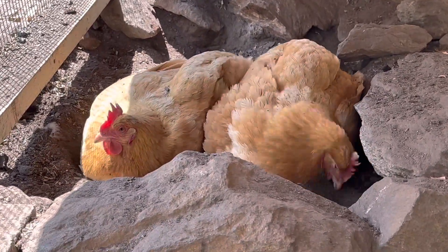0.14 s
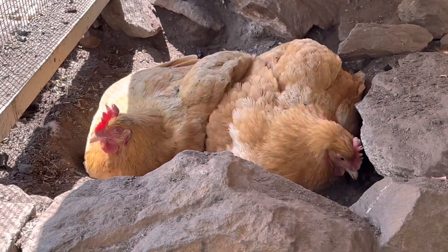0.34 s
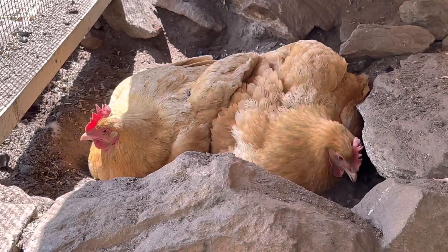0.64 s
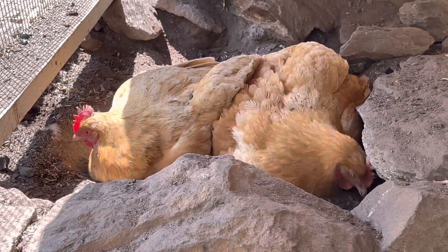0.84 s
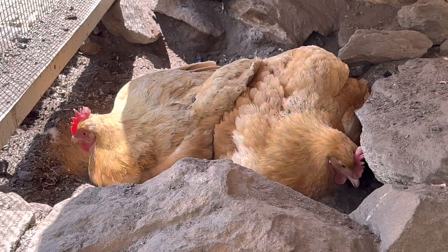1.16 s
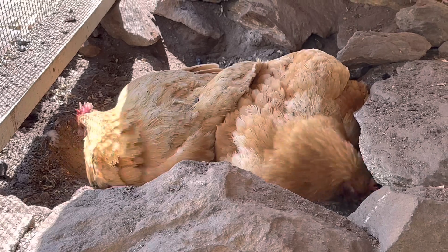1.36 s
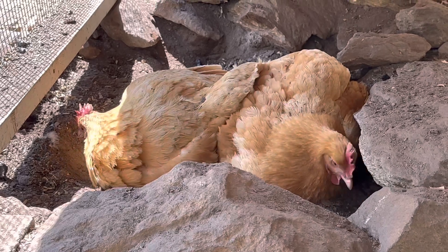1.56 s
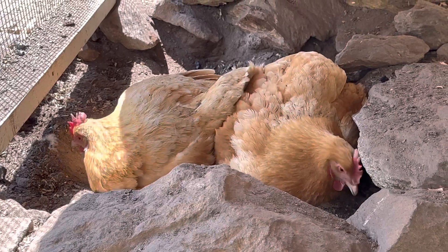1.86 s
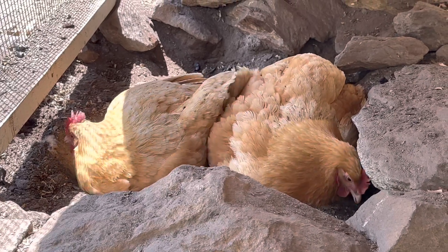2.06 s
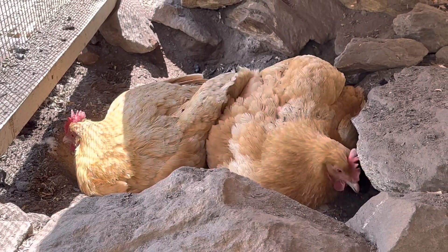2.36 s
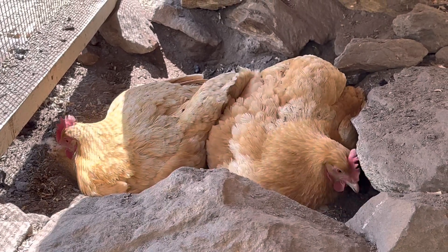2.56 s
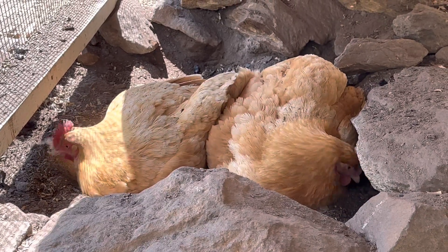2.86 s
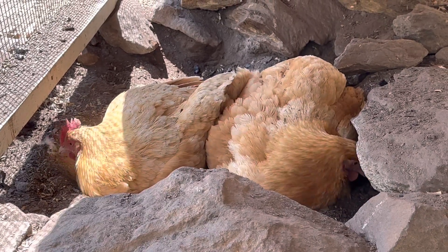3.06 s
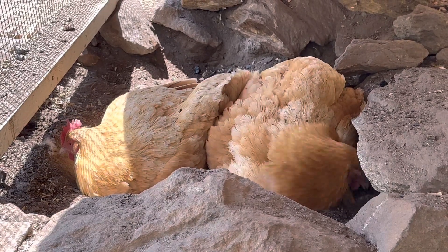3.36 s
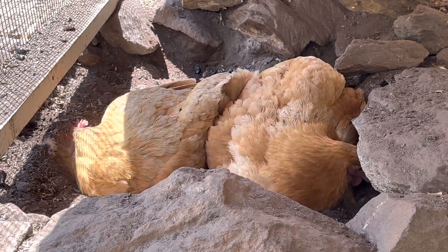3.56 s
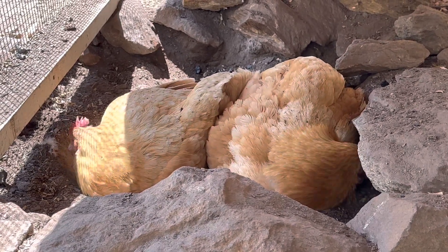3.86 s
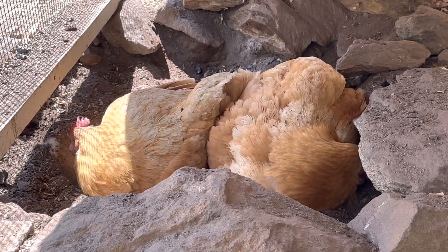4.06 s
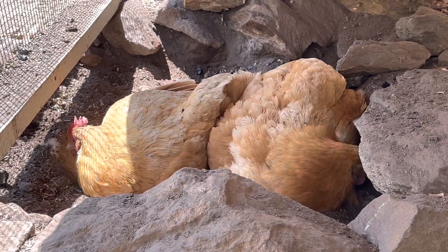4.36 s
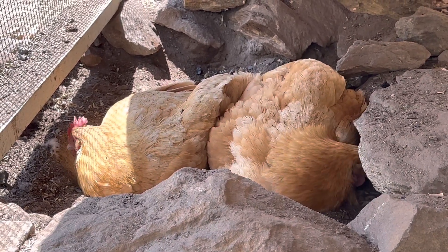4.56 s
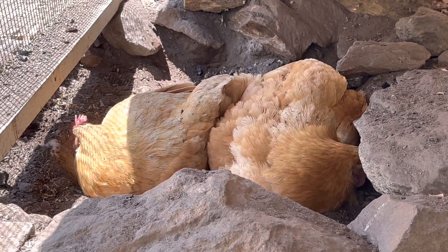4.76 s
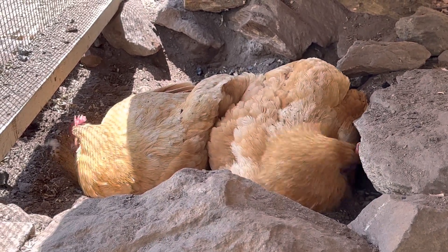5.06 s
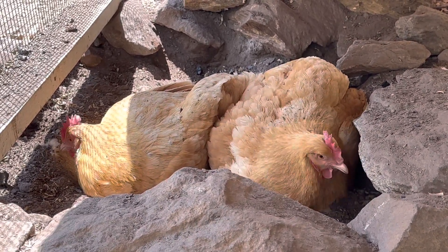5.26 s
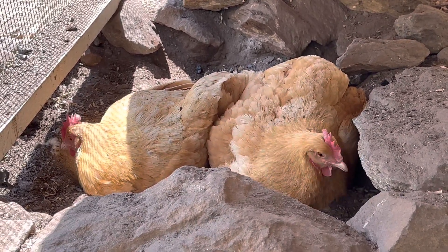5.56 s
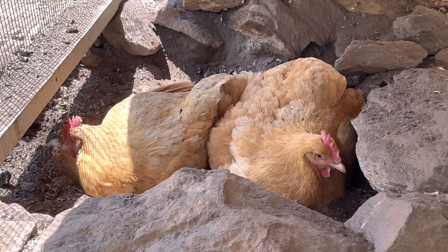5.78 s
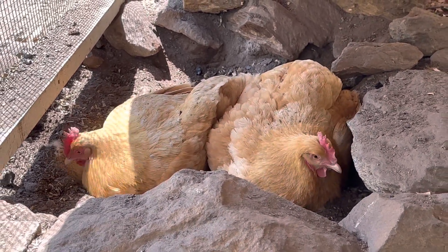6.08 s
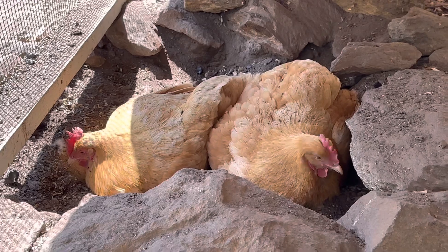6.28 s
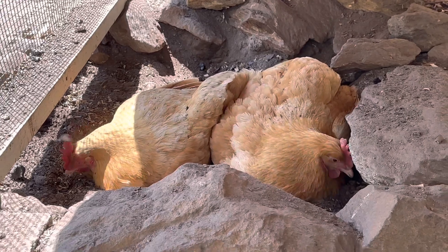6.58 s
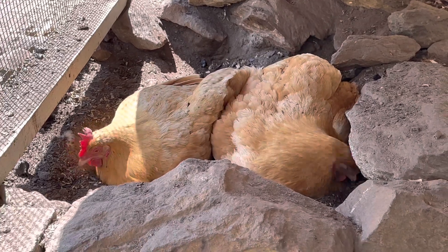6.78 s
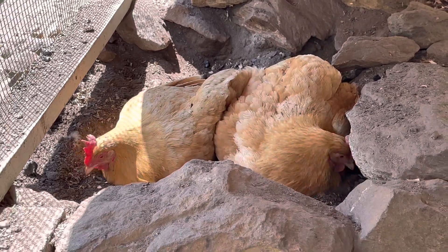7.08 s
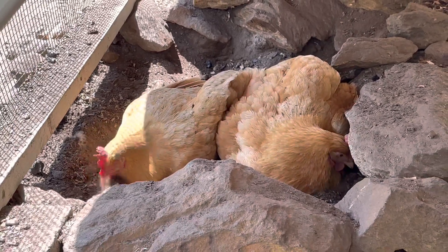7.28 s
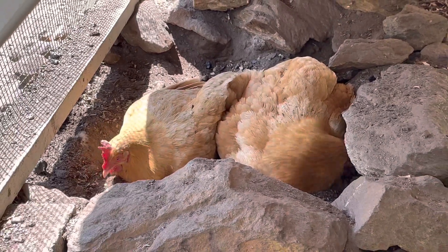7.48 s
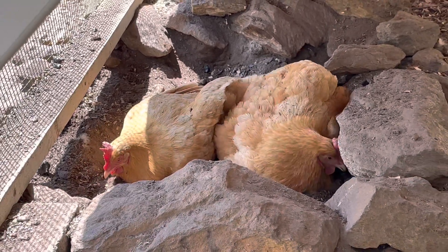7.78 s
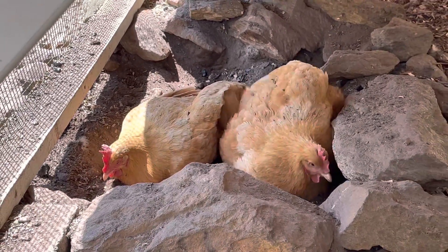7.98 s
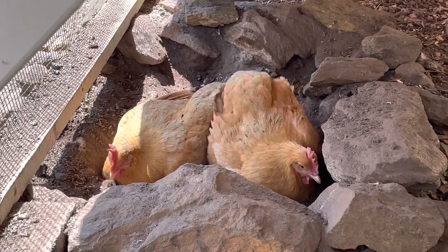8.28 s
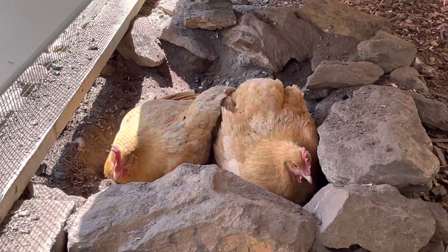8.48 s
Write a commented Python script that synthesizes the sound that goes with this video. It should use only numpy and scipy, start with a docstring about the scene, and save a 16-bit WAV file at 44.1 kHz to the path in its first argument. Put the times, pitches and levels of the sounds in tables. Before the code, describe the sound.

Two hens shuffle in a dusty hollow between rocks, heard close: dry grit trickles and ticks, feathers brush softly, beaks scrape and thud. One gives a single short, low cluck early on. Small birds peep thinly a little way off. Far behind, an engine rises in pitch over low traffic, drops out for a gear change, then pulls again. Three brief squeaks come from the dust near the end.

```python
"""From the start two hens shuffle in a dust hollow between rocks: feathers brush, grit ticks, beaks scrape.
Small birds peep a little way off, and a distant engine pulls up in pitch over the low wash of traffic.
At 1.7 s one hen clucks once. Near 4.5 s the engine drops out for a gear change, and from 5.2 s it pulls again.
Late on, three brief squeaks come from the dust. The noises are shaped random grains; the voices,
the engine and the squeaks are built from gliding tones and resonances."""
import sys
import numpy as np
from scipy import signal
from scipy.fft import rfft, irfft
from scipy.io import wavfile
from scipy.ndimage import uniform_filter1d

SR = 44100
rng = np.random.default_rng(int(sys.argv[2]) if len(sys.argv) > 2 else 0)


def wav_record(signal):
    """Record a signal, one row per channel, as 16-bit PCM in the file named by sys.argv[1]."""
    frames = np.transpose(np.atleast_2d(signal))
    bounded = np.clip(frames, -1, 1)
    # unit amplitude maps onto the largest positive 16-bit level
    quanta = np.round(bounded * 32767).astype(np.int16)
    wavfile.write(sys.argv[1], SR, quanta)


N = 380583
TIME = np.arange(N) / SR


def gain_of(db):
    """Turns decibels into amplitude."""
    return 10 ** (np.asarray(db) / 20)


def evened(x):
    """Scales a sound to an average strength (rms) of 1."""
    return x / np.sqrt(np.mean(x ** 2) + 1e-20)


def read(points, hz):
    """Reads a table of values between its points, on a log-frequency axis."""
    f, value = np.transpose(points)
    return np.interp(np.log(hz + 1), np.log(f + 1), value)


def add(mix, start, sound):
    """Adds a sound to the mix at its start time in seconds."""
    part = mix[max(round(start * SR), 0):][:len(sound)]
    part += sound[:len(part)]


def colour(x, spectrum):
    """Filters a sound by a spectrum, which sets its tone colour, at rms 1."""
    hz = np.fft.rfftfreq(len(x), 1 / SR)
    return evened(irfft(rfft(x) * gain_of(read(spectrum, hz)), len(x)))


def wander(size, hz):
    """Makes a random curve of rms 1 that drifts no faster than hz."""
    knots = rng.standard_normal(int(size / SR * hz * 2) + 3)
    return evened(np.interp(np.arange(size) / SR * hz * 2, np.arange(len(knots)), knots))


def resonate(x, hz, width):
    """Passes a sound through a resonance of gain 1 at a fixed pitch."""
    return signal.lfilter(*signal.iirpeak(hz, hz / width, fs=SR), x)


def formant(x, hz, width):
    """Passes a sound through a resonance of gain 1 whose pitch may follow a curve."""
    turn = np.exp(2j * np.pi * np.cumsum(hz * np.ones(len(x))) / SR)
    r = np.exp(-np.pi * width / SR)
    # Shift the pitch down to zero, smooth, and shift it back.
    return 2 * (turn * signal.lfilter([1 - r], [1, -r], x / turn)).real


def crumble(size, per_s, spread_db, smooth, sharpness=5):
    """Tiny impacts of very unequal size, each with its own brief pitch, over a smooth rub."""
    grains = np.zeros(size)
    for hz in np.geomspace(1200, 15000, 12):
        hits = rng.poisson(per_s * size / SR / 12)
        size_db = spread_db * np.minimum(rng.exponential(1, hits), 4)
        strength = gain_of(size_db) * rng.choice([-1, 1], hits)
        train = np.bincount(rng.integers(0, size, hits), strength, size)
        grains += resonate(train, hz, hz / sharpness)
    return evened(evened(grains) + smooth * rng.standard_normal(size))


# Shoves of a hen through the dust: (strongest at [s], length [s], grit level [dB], feather level [dB])
STROKES = [(0.084, 0.13, -76, -81), (0.214, 0.18, -73, -88), (0.496, 0.067, -76.5, -84),
           (0.59, 0.075, -87, -95), (0.917, 0.19, -79, -88), (1.363, 0.048, -68, -78),
           (2.182, 0.084, -85, -83), (2.579, 0.22, -79, -82), (2.683, 0.11, -77.5, -70.5),
           (2.805, 0.15, -81.5, -76), (3.203, 0.97, -84.5, -85.5), (3.317, 0.027, -58.5, -73),
           (3.626, 0.12, -76.5, -90), (3.755, 0.13, -75, -81), (3.9, 0.16, -83, -85),
           (4.177, 0.031, -77, -74), (4.255, 0.074, -73, -77), (5.299, 0.98, -86.5, -89),
           (5.563, 0.041, -71, -82), (5.852, 0.23, -78, -82), (6.032, 0.12, -75.5, -79),
           (6.542, 0.29, -85, -91), (6.869, 0.08, -76, -83), (7.203, 0.084, -82, -79),
           (7.495, 0.06, -74.5, -76), (7.636, 0.061, -80.5, -95), (7.84, 0.14, -74, -80),
           (8.087, 0.069, -78, -93), (8.316, 0.074, -64, -80), (8.419, 0.12, -68.5, -72)]
# Tone of dry grit: (frequency [Hz], relative level [dB per Hz])
GRIT_TONE = [(500, 13.5), (1800, -2), (3000, 3), (4500, -3.5), (7000, -2.5), (8300, -4.5), (10000, -9.5),
             (13000, -22), (16000, -35.5)]
# Tone of brushed feathers: (frequency [Hz], relative level [dB per Hz])
FEATHER_TONE = [(5000, -30), (9000, -11), (12000, 0.5), (15000, 5.5), (16000, -3)]


def shuffle(clump_db=3.0, soil_spread_db=3):
    """Each shove builds up and dies away: dry soil trickles and feathers brush in clumps."""
    t = TIME[::64]
    rise, end_db = .43, -12  # share of a shove spent building up; level at its ends
    # The hens are never quite still.
    grit_power, feather_power = gain_of(-98) ** 2, gain_of(-100) ** 2
    for strongest, length, grit_db, feather_db in STROKES:
        u = (t - strongest) / length
        away = np.maximum(-u / rise, u / (1 - rise))
        fade_db = end_db * np.minimum(away, 10) ** 0.91
        grit_power = grit_power + gain_of(grit_db + fade_db) ** 2
        feather_power = feather_power + gain_of(feather_db + fade_db) ** 2
    clumps = gain_of(clump_db * wander(N, 38))
    soil = colour(crumble(N, per_s=1800, spread_db=soil_spread_db, smooth=.45, sharpness=10), GRIT_TONE)
    plumes = colour(crumble(N, per_s=6000, spread_db=3.5, smooth=.8), FEATHER_TONE)
    soil = soil * np.interp(TIME, t, np.sqrt(grit_power))
    plumes = plumes * np.interp(TIME, t, np.sqrt(feather_power))
    return clumps * (soil + plumes)


# Pecks and scrapes: (time [s], rise [s], decay [s], crunch level [dB], thud level [dB])
SCRAPES = [(.93, 0.0047, 0.033, -67, -64), (1.364, 0.00076, 0.0056, -50, -49),
           (2.144, .0015, 0.032, -66.5, -57), (2.17, 0.018, 0.028, -66.5, -67),
           (3.281, .001, 0.008, -77, -60.5), (3.311, 0.0034, 0.0059, -66, -47),
           (3.32, 0.0019, 0.0045, -59.5, -51), (3.851, 0.0011, 0.0084, -59.5, -71),
           (4.243, 0.0068, 0.024, -64.5, -63), (4.291, 0.00052, 0.0051, -66, -55.5),
           (5.182, 0.0004, 0.012, -59, -69), (6.028, 0.00077, 0.0092, -64, -70),
           (6.516, 0.0074, 0.009, -70, -62), (6.688, 0.003, 0.022, -71, -59),
           (7.171, 0.04, 0.025, -62.5, -64.5), (7.481, 0.0079, 0.022, -70, -62.5),
           (8.283, 0.007, 0.025, -59, -69), (8.334, .008, 0.022, -68, -60), (8.435, 0.0034, .008, -69, -71)]
# Tone of the crunch: (frequency [Hz], relative level [dB per Hz])
CRUNCH_TONE = [(200, 9), (700, 8), (1400, 5.5), (2600, 12), (3800, 3), (6000, -9), (8300, -5),
               (11000, -25.5), (16000, -28)]
# Tone of the thud: (frequency [Hz], relative level [dB per Hz])
THUD_TONE = [(80, -23.5), (200, 6), (320, -15), (500, -7), (900, -5), (1500, -8), (3000, -54), (8000, -60)]


def scrapes(per_s=6000, spread_db=3, smooth=0.52, thud_linger=0.0014):
    """A beak or claw crunches through grit and thuds on the soil, the thud dying a little later."""
    out, t = np.zeros(N), np.arange(8192) / SR
    for start, rise, decay, crunch_db, thud_db in SCRAPES:
        attack, after = np.minimum(t / rise, 1), np.maximum(t - rise, 0)
        crunch = colour(crumble(len(t), per_s, spread_db, smooth), CRUNCH_TONE)
        crunch = gain_of(crunch_db) * crunch * np.exp(-after / decay)
        thud = colour(rng.standard_normal(len(t)), THUD_TONE)
        thud = gain_of(thud_db) * thud * np.exp(-after / (decay + thud_linger))
        add(out, start, attack * (thud + crunch))
    return out


# Squeaks: (time [s], time to fade by 23 dB [s], level [dB], extra level of the side modes [dB])
SQUEAKS = [(7.205, 0.038, -60.5, -13), (8.281, 0.051, -49, 2.5), (8.34, 0.048, -57, -5)]
# Ringing modes, perhaps of a scraped stone: (pitch [Hz], waver of the pitch [Hz], level [dB])
STONE_MODES = [(686, 58, -1.5), (1462, 60, -6), (1917, 15, 6.5), (2335, 25, -14), (3220, 37, -25),
               (3540, 67, -27), (4370, 54, -17), (6600, 60, -15)]


def squeaks(stutter_db=0.8):
    """The stone's modes waver and stutter while it is rubbed, then stop; a harder rub wakes more of them."""
    out, t = np.zeros(N), np.arange(4096) / SR
    loudest = max(db for _, _, db in STONE_MODES)
    for start, length, level_db, side_db in SQUEAKS:
        ring = np.zeros(len(t))
        for hz, waver_hz, db in STONE_MODES:
            mode_db = db + side_db * (db < loudest) + stutter_db * wander(len(t), 106)
            angle = 2 * np.pi * np.cumsum(hz + waver_hz * wander(len(t), 142)) / SR
            ring += gain_of(mode_db) * np.sin(angle)
        rise = np.minimum(t / 0.0077, 1)
        add(out, start, evened(ring) * rise * gain_of(level_db - 23 * (t / length) ** 2))
    return out


# The loudest grains flicked against the rocks:
# (time [s], level [dB], share of top treble [dB, kept between -20 and -0.4], ring pitch [Hz])
TICKS = [(.075, -61, -22, 3400), (.1366, -68, -8, 6650), (.1705, -69, -22, 3570), (.2214, -62, -5, 4630),
         (.2535, -63, -12, 3500), (.286, -60, -25, 3420), (.595, -71, -25, 3320), (1.0974, -70, -6, 3980),
         (1.3665, -53, -19, 8100), (1.399, -70, -12, 6000), (2.5411, -73, 1, 4270), (2.7013, -62, -7, 4800),
         (2.797, -74, -9, 5060), (2.825, -67, -11, 6760), (2.881, -60.5, 1.5, 8840),
         (2.988, -70, -12, 6500), (2.997, -60.5, -6, 9100), (3.202, -63.5, -5, 5570),
         (3.2812, -53, -21, 4930), (3.3108, -47, -23, 3370), (3.422, -68.5, -17, 4600),
         (3.6238, -65.5, -15, 6180), (3.708, -64, -17, 8330), (3.8513, -56, -9, 6900),
         (3.859, -61.5, -11, 4290), (3.92, -72, -11, 3400), (4.2926, -58, -16, 3320),
         (4.5872, -68, -28, 3450), (5.182, -65, -26, 3400), (5.435, -75, 0, 3670), (5.5273, -73, 1, 3390),
         (5.739, -69, -24, 6850), (5.7728, -65.5, -27, 7900), (5.9324, -64, -23, 8200),
         (6.0267, -55.5, -9, 4240), (6.481, -63.5, -16, 4460), (7.2929, -67, .5, 3400),
         (7.4629, -66, -11, 3330), (7.7656, -61, -31, 5180), (7.9159, -61.5, -13, 6540),
         (8.13, -61.5, -8, 7800), (8.285, -57, -22, 7950), (8.3735, -60, -24, 5760),
         (8.406, -62, -22, 7220), (8.4225, -61, -9, 6010), (8.4745, -63.5, -25, 4500),
         (8.5774, -70, -9, 5490)]


def flung_grains(per_s=45, level_db=-3.5, spread_db=5, top_db=-20, low_hz=4080, high_hz=9160):
    """Each shove also flings grains at random moments, with random strengths and ring pitches."""
    flung = []
    for strongest, length, grit_db, _ in STROKES:
        for when, size, note in rng.random((64, 3))[:round(per_s * length)]:
            start = strongest + length * (when - .5)
            db = grit_db + level_db - spread_db * np.log(max(size, .2))
            flung.append((start, db, top_db, low_hz * (high_hz / low_hz) ** note))
    return flung


def ticks(grit_db=-1, top_db=3, ring_db=-8):
    """A grain cracks against rock and rings briefly, and finer dust settles after it."""
    out, t = np.zeros(N), np.arange(2048) / SR
    crack_s, decay_s, settle_s, ring_s = 0.00014, 0.0038, 0.013, 0.0076
    fade = gain_of(3) * np.exp(-t / crack_s) + np.exp(-t / decay_s) + gain_of(-19) * np.exp(-t / settle_s)
    for start, db, bright_db, pitch in list(TICKS) + flung_grains():
        share = np.clip(gain_of(bright_db), .1, .95)
        low, high = rng.standard_normal((2, len(t)))
        dull = gain_of(grit_db) * np.sqrt(1 - share ** 2) * colour(low, GRIT_TONE)
        bright = gain_of(top_db) * share * colour(high, FEATHER_TONE)
        ring = gain_of(ring_db) * (1 - share) * np.sin(2 * np.pi * pitch * t) * np.exp(-t / ring_s)
        add(out, start, gain_of(db) * ((dull + bright) * fade + ring))
    return out


# The cluck: (time [s], effort [dB], pitch [Hz], beak opening as gain of the upper resonances [dB],
# wheeze against the voice, before it is pulsed [dB])
CLUCK = [(1.7299, -50, 270, 6, -46), (1.734, -46, 283, 6, -42), (1.738, -36.5, 284, 1, -35),
         (1.746, -34.5, 293, 1.5, -26), (1.753, -33, 273, -2.5, -22), (1.763, -29.5, 259, -6.5, -27),
         (1.768, -34, 250, -7, -32), (1.772, -46, 240, 2, -52)]
# Throat resonances, chest first: (pitch [Hz], width of one of two passes [Hz], level [dB])
THROAT = [(270, 150, 3), (623, 180, 2.5), (867, 116, 7), (1206, 170, -5)]
# Air through the hen's throat: (pitch [Hz], width of one of two passes [Hz], level [dB])
WHEEZE = [(2050, 240, -11), (3350, 220, -14), (3920, 200, -9)]


def cluck(rasp=0.06, jitter=0.023, limp=0.53):
    """Pulses in uneven pairs pass the throat, every second one wheezing; the beak closes and the note darkens."""
    times, *columns = np.transpose(CLUCK)
    t = np.arange(times[0] - .02, times[-1], 1 / SR)
    effort_db, pitch, open_db, wheeze_db = (np.interp(t, times, c) for c in columns)
    angle = 2 * np.pi * np.cumsum(pitch * (1 + jitter * wander(len(t), 261))) / SR
    angle -= np.interp(times[0], t, angle)
    pair = np.cos(angle / 2)  # one turn for every two pulses
    uneven = limp * pair * np.interp(t, times[[0, -1]], [.3, 1])
    harmonics = np.arange(1, 5)[:, None]
    pulses = evened(np.cos(harmonics * (angle + uneven)).sum(0))
    drive = pulses + rasp * (1 + np.cos(angle)) * rng.standard_normal(len(t))
    # The upper resonances sink by 17 % over the last 19 ms.
    beak = 1 - 0.17 * np.clip(1 - (times[-1] - t) / 0.019, 0, 1)
    places = [1] + [beak] * (len(THROAT) - 1)
    parts = []
    for (hz, width, db), place in zip(THROAT, places):
        once = formant(drive, hz * place, width)
        parts.append(gain_of(db) * formant(once, hz * place, width))
    chest, *upper = parts
    air = rng.standard_normal(len(t))
    hiss = sum(gain_of(db) * formant(formant(air, hz, width), hz, width) for hz, width, db in WHEEZE)
    wheeze = gain_of(wheeze_db) * evened(hiss) * ((1 + pair) / 2) ** 2 / 2
    voice = evened(chest + gain_of(open_db) * sum(upper)) + wheeze
    soft_ends = np.clip(np.minimum(t - times[0], times[-1] - t) / 0.00092, 0, 1)
    out = np.zeros(N)
    add(out, t[0], voice * gain_of(effort_db) * soft_ends)
    return out


def slap(x):
    """A wall some metres off throws back the low part of the cluck."""
    delay_s, level_db, top_hz = .028, -17, 450
    out = np.zeros(N)
    add(out, delay_s, gain_of(level_db) * signal.lfilter(*signal.butter(2, top_hz, fs=SR), x))
    return out


def peep(start, length, crest_hz, lift, drop, db, scatter_db):
    """A thin whistle bends to a crest and swells as it slides down, trailed by an echo and near reflections."""
    octave_db, flutter_db, quaver, scatter_quaver = -24, 3.5, 0.0099, 0.019
    u, lag = np.linspace(-.1, 1.05, int(1.15 * length * SR)), np.arange(2048) / SR
    crest = .35  # share of the length at which the pitch crests
    slide = np.sin(np.pi / 2 * np.maximum((u - crest) / (1 - crest), 0) ** 1.5)
    hz = crest_hz * (1 - lift * np.maximum(1 - u / crest, 0) ** 2 - drop * slide)
    scattered = gain_of(scatter_db)
    waver, flutter = wander(SR // 4, 220)[:len(u)], wander(SR // 4, 70)[:len(u)]
    depth = quaver + scatter_quaver * min(scattered, 1)
    angle = 2 * np.pi * np.cumsum(hz * (1 + depth * waver)) / SR
    # Strongest near 0.62 of the length, and louder the further the pitch slides.
    swell_db = -9 * abs(u - 0.62) + 13.5 * drop * slide + flutter_db * flutter
    swell = signal.windows.tukey(len(u), .3) * gain_of(swell_db)
    # Only low, near notes carry an octave.
    overtone = gain_of(octave_db) * np.sin(2 * angle) * np.clip((3000 - hz) / 600, 0, 1) / (1 + scattered)
    whistle = gain_of(db) * evened(swell * (np.sin(angle) + overtone)) / np.hypot(1, scattered)
    trail = signal.fftconvolve(whistle, rng.standard_normal(len(lag)) * np.exp(-lag / 0.022))
    sound = scattered * trail * np.linalg.norm(whistle) / np.linalg.norm(trail)
    add(sound, 0, whistle)
    # One hard surface near the birds doubles each peep, 7 to 10 ms later.
    add(sound, rng.uniform(0.00672, 0.00996), gain_of(-13.5) * whistle)
    return start - length / 10, sound


# Peeps: (time [s], length [s], crest pitch [Hz], start below the crest [share of pitch, negative: above],
# pitch lost in the slide [share], level of direct sound and reflections together [dB],
# reflections over direct sound [dB])
PEEPS = [(.022, 0.079, 3114, 0.092, 0.11, -65.5, -13), (0.257, 0.087, 3267, 0.17, .15, -65, -16),
         (.612, 0.063, 2470, 0.038, 0.19, -61, -17), (.774, 0.075, 2650, -0.063, 0.27, -64, -5),
         (.852, 0.048, 3640, -0.094, 0.28, -78.5, 2), (1.28, 0.033, 3420, 0.024, .15, -80, 6),
         (1.398, 0.046, 3460, .04, 0.2, -77, -3), (1.573, 0.029, 3560, 0, .16, -77, -1),
         (1.599, 0.046, 2790, 0.036, .047, -76, 3), (1.772, 0.026, 2820, 0, .02, -73.5, -9),
         (2.03, .07, 2730, 0.091, 0.21, -64.5, -12), (2.19, 0.069, 2786, -0.15, 0.19, -64.5, -8),
         (2.355, 0.087, 2934, -0.0056, 0.27, -64, -7), (3.021, 0.034, 3610, -0.069, 0.33, -79.5, 0),
         (3.137, 0.05, 3850, -.04, 0.41, -74.5, -9), (3.498, 0.07, 3065, 0.032, 0.16, -63, -11),
         (3.708, 0.072, 3373, .2, 0.23, -67.5, -2), (3.805, .035, 2780, .04, .1, -77, 2),
         (4.61, 0.048, 4160, 0.14, .19, -66, -9), (4.627, 0.064, 2897, 0.015, 0.21, -68.5, -6),
         (4.767, 0.069, 3007, -0.12, 0.22, -67.5, -3), (4.945, .068, 2795, 0.057, 0.16, -66.5, -6),
         (4.958, 0.025, 3750, 0.032, 0.18, -82, -3), (4.99, 0.022, 3900, -0.02, 0.026, -86, 1),
         (5.143, 0.032, 4220, -0.018, 0.06, -82, -1), (5.5, .028, 3950, 0.048, .2, -81.5, -3),
         (5.636, 0.05, 2743, -0.06, 0.086, -74.5, -2), (5.668, 0.019, 3560, -.15, 0.11, -75.5, 0),
         (5.762, 0.037, 3620, .08, 0.11, -76.5, -2), (5.784, 0.039, 2560, -.1, .11, -64.5, 1),
         (5.821, 0.027, 4240, -0.03, .05, -79, -4), (5.927, 0.055, 3130, -0.034, .13, -64.5, -2),
         (6.088, 0.067, 3260, 0.047, 0.099, -68, 1), (6.284, 0.028, 3820, -0.053, .3, -75.5, 4),
         (6.287, 0.021, 3400, .1, 0.032, -78, -2), (6.507, 0.043, 3060, -0.11, 0.21, -73.5, -4),
         (6.607, 0.045, 3130, -0.096, 0.26, -68.5, -7), (6.644, .045, 2570, 0, .058, -70, -1),
         (6.698, .048, 4000, -.02, .27, -70, -2), (6.732, 0.048, 3420, -0.077, 0.15, -74.5, 2),
         (6.889, 0.053, 3240, -0.12, .22, -78.5, -1.5), (6.98, 0.028, 4050, 0.02, 0.075, -89, 3),
         (6.984, 0.048, 3310, -0.032, .17, -77, -3), (7.056, 0.048, 3450, -.02, .08, -84, 0),
         (7.16, 0.026, 2770, -.03, 0.077, -75, 0), (7.345, 0.049, 2960, -.03, 0.22, -65, -1),
         (7.517, 0.056, 3240, 0.02, 0.048, -69, 1), (7.784, 0.061, 3250, -0.0097, .17, -79, -4),
         (7.918, 0.063, 3400, -.02, 0.11, -76, -2), (7.972, .04, 3830, -.1, 0.19, -79, 2),
         (7.983, 0.039, 2630, -.1, .1, -69, -2), (8.103, 0.053, 3030, 0.04, 0.091, -76, 2),
         (8.122, 0.076, 3160, -0.12, 0.24, -71.5, -2), (8.248, 0.043, 3470, 0.034, 0.04, -77, -12),
         (8.288, 0.043, 2900, -.12, .04, -62, -15), (8.33, 0.029, 2630, -0.013, .035, -66, -11),
         (8.455, .03, 3400, -0.017, .27, -78, -2)]


def peeps():
    """The small birds whistle one peep after another, some overlapping."""
    out = np.zeros(N)
    for row in PEEPS:
        add(out, *peep(*row))
    return out


# How long reflections last: (frequency [Hz], time to fall by 60 dB [s])
YARD_FADE = [(200, 0.091), (1000, 0.079), (3000, 0.095), (8000, 0.048), (16000, 0.031)]


def yard(x):
    """Sparse reflections come off rocks and fences, different in each ear, fading at a rate set by pitch."""
    taps = rng.standard_normal((2, SR // 2)) * (rng.random((2, SR // 2)) < 2000 / SR)
    hz, t, z = signal.stft(taps, SR, nperseg=256)
    fade = gain_of(-60 * t / read(YARD_FADE, hz)[:, None]) * (t > .004)
    tail = signal.istft(z * fade, SR, nperseg=256)[1]
    return signal.fftconvolve(x[None], tail / np.linalg.norm(tail[0]), axes=1)[:, :N]


# The far engine before the gear change: (time [s], firing rate [Hz], fundamental level [dB])
LOW_GEAR = [(0, 84.83, -54.5), (.85, 84.84, -55), (2.3, 88.27, -48), (3.05, 88.48, -48),
            (3.55, 90.54, -41.5), (4.25, 92.25, -45), (4.43, 90.4, -51.5)]
# After it the exhaust booms too:
# (time [s], firing rate [Hz], fundamental level [dB], second harmonic level [dB])
HIGH_GEAR = [(5.17, 77.84, -54.5, -59), (5.4, 77.95, -46.5, -53.5), (5.95, 77.93, -43.5, -56),
             (6.45, 79.19, -46, -65.5), (7.15, 81.42, -51.5, -64), (8.63, 84.24, -51, -86)]


def engine(rows, waver_db):
    """Only the lowest exhaust harmonics carry this far; they die away when the throttle closes."""
    times, *columns = np.transpose(rows)
    hz, *harmonics = (np.interp(TIME, times, c) for c in columns)
    angle = 2 * np.pi * np.cumsum(hz) / SR
    on_throttle = np.interp(TIME, [times[0] - .06, times[0], times[-1], times[-1] + 0.046], [0, 1, 1, 0])
    tone = sum(gain_of(db) * np.sin(k * angle) for k, db in enumerate(harmonics, 1))
    return np.sqrt(2) * tone * on_throttle * gain_of(waver_db * wander(N, 23))


# Other vehicles farther off:
# (nearest at [s], time from there to half amplitude [s], pitch [Hz], glide [Hz per s], level [dB])
PASSES = [(0.101, 0.28, 105.5, 0.1, -64.5), (1.851, 0.45, 104.6, .8, -52.5), (3.2, 0.25, 66.8, .1, -57),
          (6.802, .5, 93.1, -1, -56), (7.8, 0.39, 108.5, 2, -62)]


def drone():
    """Each far vehicle is one low note that swells and fades as it passes."""
    out = np.zeros(N)
    for nearest, swell, hz, glide, db in PASSES:
        t = TIME - nearest
        angle = 2 * np.pi * np.cumsum(hz + glide * np.clip(t, -1, 1)) / SR
        out += np.sqrt(2) * gain_of(db) / (1 + (t / swell) ** 2) * np.sin(angle)
    return out


# Tone of the neighbourhood: (frequency [Hz], relative level [dB per Hz])
WASH_TONE = [(20, -26), (40, -13.5), (62, 3.5), (100, -2), (140, -7.5), (200, -11.5), (320, -20),
             (410, -19.5), (520, -21.5), (700, -24), (1600, -25.5), (2300, -34.5), (3500, -52), (5000, -56),
             (10000, -56.5), (16000, -65.5)]
# How alike the two ears hear it: (frequency [Hz], likeness [1 same, 0 unrelated, below 0 opposed])
WASH_SAME = [(60, 0.94), (130, 0.91), (290, 0.55), (640, 0.057), (1450, -0.4), (2200, 0.92), (5000, 0.9),
             (15000, 0.98)]


def wash(patchy_db=1.03):
    """Far traffic is noise drifting in patches, alike in both ears in bass and treble, diffuse between."""
    hz = np.fft.rfftfreq(2048, 1 / SR)
    a, b, c, d, patches = rng.standard_normal((5, N // 512 + 5, len(hz)))
    patches = uniform_filter1d(patches, size=10, axis=0)
    patches = evened(uniform_filter1d(patches, size=20, axis=1))
    same, left = np.clip(read(WASH_SAME, hz), -1, 1), a + 1j * b
    right = same * left + np.sqrt(1 - same ** 2) * (c + 1j * d)
    z = np.array([left, right]) * gain_of(read(WASH_TONE, hz) + patchy_db * patches)
    air = signal.istft(z.transpose(0, 2, 1), nperseg=2048, noverlap=1536)[1][:, :N]
    # The traffic slowly grows, with one lull around 4.63 s.
    lull_db = -1.5 * np.exp(-((TIME - 4.63) / 0.75) ** 2)
    return evened(air) * gain_of(-53.5 + 0.2736 * TIME + lull_db)


def scene(near_wet_db=-13, cluck_wet_db=-17, bird_wet_db=-11):
    """Puts the hens close by, the peeping farther off and the engine far away."""
    far = wash() + engine(LOW_GEAR, waver_db=-1.0) + engine(HIGH_GEAR, waver_db=-0.3) + drone()
    hen, birds = cluck(), peeps()
    dust = shuffle() + scrapes() + squeaks() + ticks()
    echo = yard(gain_of(near_wet_db) * dust + gain_of(cluck_wet_db) * hen + gain_of(bird_wet_db) * birds)
    return dust + hen + slap(hen) + birds + far + echo


# Stereo image: (frequency [Hz], phase by which left leads [radians])
STEREO_PHASE = [(2000, .05), (3000, .6), (4650, .1), (6800, .3), (7320, 2.7), (7670, 3.5), (8010, 5.7),
                (9220, 5.7), (9900, 4.2), (10500, 3.3), (12200, 2.6), (13400, .3), (16000, 0)]


def record(dry):
    """Sets the stereo image: bass nearly in step, treble shifted between left and right; then the band limits."""
    hz = np.fft.rfftfreq(N, 1 / SR)
    # Left over right: (frequency [Hz], level [dB])
    balance = [(100, .3), (600, .5), (1000, -1.5), (1500, -5), (2100, 0), (4000, .4), (8000, .1)]
    phase = read(STEREO_PHASE, hz) * np.minimum(hz / STEREO_PHASE[0][0], 1)
    side = gain_of(read(balance, hz) / 2) * np.exp(.5j * phase)
    low_cut = hz ** 3 / np.sqrt(hz ** 6 + 40. ** 6)  # removes rumble below 40 Hz
    heard = irfft(rfft(dry) * low_cut * np.array([side, 1 / side]), N)
    top_cut = signal.firwin(511, 15900, window=("kaiser", 9), fs=SR)  # removes treble above 15.9 kHz
    return signal.oaconvolve(heard, top_cut[None], "same")


dry = scene()
out = record(dry)
wav_record(out)
```